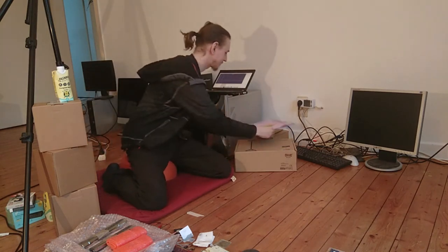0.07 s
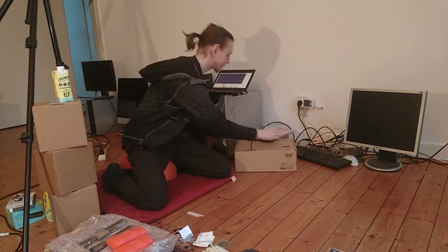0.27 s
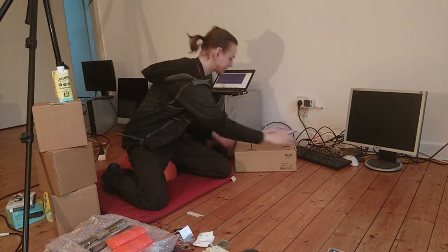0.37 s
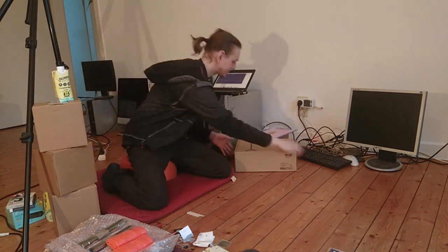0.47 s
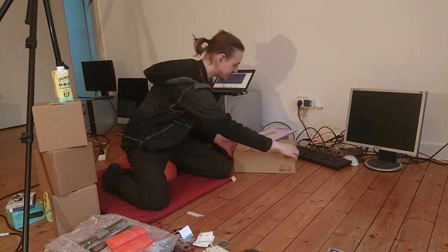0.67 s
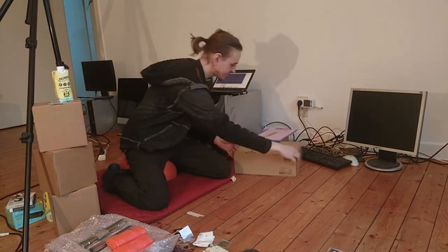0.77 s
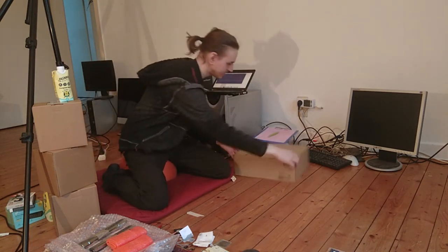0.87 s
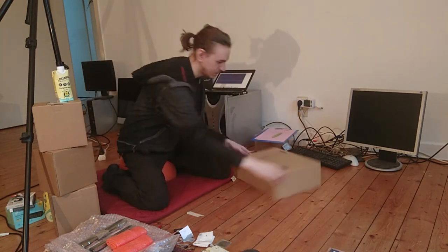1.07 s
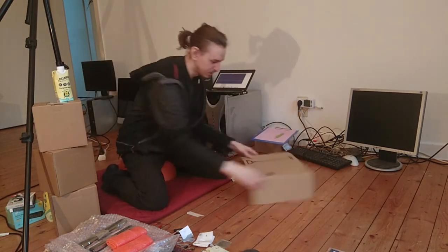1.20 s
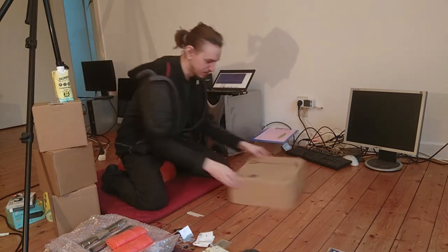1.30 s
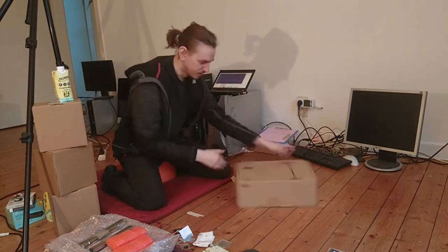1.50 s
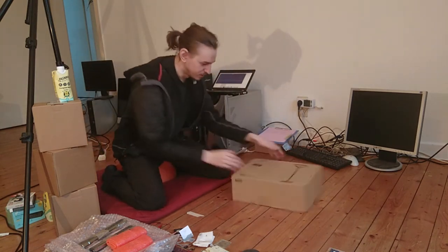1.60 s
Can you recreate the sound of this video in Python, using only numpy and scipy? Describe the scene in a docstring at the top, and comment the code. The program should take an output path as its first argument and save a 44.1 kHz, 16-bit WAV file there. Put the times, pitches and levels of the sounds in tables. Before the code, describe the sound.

Cardboard box in a lively bare room: a tight burst of loud thumps with bright metallic rattle, a short lull, then a much quieter gritty drag over wooden boards with soft bumps, mono microphone.

```python
"""A cardboard box in a bare room takes a burst of blows as something is dropped onto it, then is dragged over floorboards.
Each blow is a half-sine push that rings panel and floor modes, with a short noise slap of card.
Small metal parts inside jangle as ringing modes with noise ticks, then settle. The drag is dense random clicks:
slips hiss, catches shake the damped panels, edges scuff, and the box bumps on the joints of the boards.
A noise tail makes the room; behind it lie air noise and a faint appliance hum. One microphone."""
import sys
import numpy as np
from scipy import signal
from scipy.fft import rfft, irfft
from scipy.io import wavfile
from scipy.ndimage import uniform_filter1d

SR = 44100
rng = np.random.default_rng(int(sys.argv[2]) if len(sys.argv) > 2 else 0)


def ratio_of_db(decibels):
    """Turn decibels (scalar or array-like) into linear amplitude factors; 0 dB maps to 1."""
    return 10 ** (np.asarray(decibels, float) / 20)


def to_wav(s):
    """Save 16-bit WAV."""
    ch = np.atleast_2d(s).T  # columns
    pcm = np.round(np.clip(ch, -1, 1) * 32767)  # PCM
    wavfile.write(sys.argv[1], SR, pcm.astype(np.int16))


N = 72765  # length [samples]

# Blows on the box: (time [s], push level [dB], contact length [ms], slap level relative to the push [dB])
BLOWS = [(.2235, -19.5, 0.71, -8), (.229, -8, 1.93, -15), (.2548, -5.5, 1.08, -10.5),
         (.2585, -5.5, 0.63, -19), (.2645, -9.5, 1.33, -13.5), (.2705, -6.5, 1, -16),
         (.291, -8.5, 1.7, -17), (.316, -9, 1.84, -17)]
# Box panels and the air inside, when free to ring:
# (frequency [Hz], level [dB], ring time t60 [s], extra level when bumped from below [dB])
BOX_MODES = [(123, -8.5, 0.047, -9), (181, -11, 0.053, 0.5), (266, -12, 0.038, 2.5),
             (349.5, -8.5, 0.065, -2.5), (424, -0.5, 0.048, -9), (547, -4.5, 0.04, -1),
             (691, -4, 0.044, -9.5), (758, -6.5, 0.045, -9), (854.6, -14.5, 0.072, 8.5),
             (1128, -10.5, 0.018, 1.5), (1444, -9.5, 0.038, 0), (1760, -31, 0.023, 5)]


def table(rows, x, col=1, log=False):
    """Read a column at x along straight lines between the rows, over log x if asked."""
    r = np.array(rows, float)
    if log:
        return np.interp(np.log(x), np.log(r[:, 0]), r[:, col])
    return np.interp(x, r[:, 0], r[:, col])


def unit(x):
    """Scale to rms 1."""
    return x / np.sqrt(np.mean(x ** 2))


def colour(x, rows):
    """Filter x by a gain curve of (frequency [Hz], gain [dB]) points."""
    hz = np.arange(N // 2 + 1) * SR / N + 1  # 1 Hz up, to keep the logarithm finite
    return irfft(rfft(x) * ratio_of_db(table(rows, hz, log=True)), N)


def ring(x, modes):
    """Each mode is a decaying sine started by x (one row of x per mode, or one for all)."""
    out = np.zeros(N)
    for k, (hz, db, t60, *_) in enumerate(modes):
        pole = np.exp(2j * np.pi * hz / SR - np.log(1000) / (t60 * SR))
        drive = x[k] if x.ndim > 1 else x
        out += ratio_of_db(db) * signal.lfilter([1], [1, -pole], drive).imag
    return out


def grains(per_s, scatter_db):
    """Random clicks of both signs, a few much larger than the rest."""
    chance, sign, size = rng.random((3, N))
    return (chance < per_s / SR) * np.sign(sign - .5) * ratio_of_db(-scatter_db * np.log(size + 0.006))


def walk(rate):
    """Slow smoothed chance, rate new values per second, with a spread of about one half."""
    k = int(SR / rate)
    held = np.repeat(rng.standard_normal(N // k + 1), k)
    return 0.62 * uniform_filter1d(uniform_filter1d(held, k), k)[:N]


def add(x, s, piece):
    """Mix a piece into x at time s [s]."""
    i = int(s * SR)
    x[..., i:i + piece.shape[-1]] += piece[..., :N - i]


def knocks():
    """A half-sine push of contact length rings panels and floor; a short noise slap of card comes with it."""
    # Bumps of the box on the boards: (time [s], push level [dB], contact length [ms])
    bumps = [(.688, -39, 1.2), (0.7002, -30, 1.07), (.716, -42, 1.13), (1.049, -28, 1.57),
             (1.143, -26, 1.34), (1.2624, -24.5, 0.55), (1.271, -25, 0.99), (1.281, -25.5, 1.5),
             (1.294, -24.5, 1.4), (1.362, -26, 0.99)]
    # Deep modes of floor and room: (frequency [Hz], level [dB], ring time t60 [s])
    deep = [(62, -33, 1.17), (64.9, -35.5, 0.3), (94.8, -27, 0.91), (95.6, -25, 0.35)]
    spot_scatter_db = 1.5  # each knock lands elsewhere

    rows = BLOWS + [bump + (-26,) for bump in bumps]  # bumps hardly slap
    count = len(BOX_MODES) + len(deep)
    push, slap = np.zeros((count, N)), np.zeros(N)
    u = np.arange(1500) / SR
    where = ratio_of_db(spot_scatter_db * rng.standard_normal((len(rows), count)))
    where *= (-1) ** np.arange(count)  # neighbouring modes start in opposite directions
    where[len(BLOWS):, :len(BOX_MODES)] *= ratio_of_db(np.array(BOX_MODES)[:, 3])
    noise = rng.standard_normal((len(rows), len(u)))
    for k, (s, db, contact_ms, slap_db) in enumerate(rows):
        shape = np.sin(np.pi * np.clip(u * 1000 / contact_ms, 0, 1))
        add(push, s, ratio_of_db(db) * where[k][:, None] * shape / shape.sum())
        burst = noise[k] * np.exp(-u / 0.0062) * np.clip(u / 0.0005, 0, 1)
        add(slap, s, ratio_of_db(db + slap_db) * burst)
    card = colour(slap, [(300, -21), (1300, 13), (4000, 0), (16000, -5)])
    return ring(push, BOX_MODES) + card, ring(push[len(BOX_MODES):], deep)


def jangle():
    """Clinks start the metal modes with a noise burst plus a tick; random chatter dies away after a main blow."""
    # Clinks of the metal parts: (time [s], level [dB], tick level relative to the clink [dB])
    clinks = [(.1035, -50, 13), (.1415, -51.5, 13.5), (.164, -50, 4), (.183, -56, 7), (.2235, -33, -1),
              (.230, -32.5, 7), (.241, -28, 12), (.2515, -11.5, -10), (.258, -34, -18), (.263, -18, 10),
              (.267, -10, -37), (.277, -23, 7), (.288, -31, -5), (.297, -19, 7), (.306, -18.5, 8),
              (.318, -29.5, -4), (.340, -27.5, 0.5), (.365, -27, 4), (.381, -36, -6), (.391, -28, 0),
              (.411, -22.5, 8), (.439, -41, -5), (.461, -38, 2), (.477, -41, 11), (.512, -55, -3),
              (.626, -40.5, -5), (.749, -42, 3), (.840, -60, -9), (.861, -31.5, -3), (.874, -37, -2)]
    # Modes of the metal parts: (frequency [Hz], level [dB], ring time t60 [s])
    metal = [(2643, -11, 0.055), (2880, -4, 0.023), (3870, -14.5, 0.072), (4850, -4.5, 0.032),
             (5580, -4, 0.011), (5850, -17, 0.088), (6260, -31, 0.033), (7450, -25, 0.074),
             (8900, -4, 0.042), (9860, -2, 0.031), (11620, -5.5, 0.041), (12960, -2, 0.01),
             (14400, -11, .015), (14700, -20, .012)]
    clink_s, tick_s = .002, .0025  # decay of the contact noise and of the tick noise [s]
    metal_scatter_db = 4.5
    chatter_per_s, chatter_db, chatter_t60_s = 490, -26.5, 0.64
    settled_s = .485  # chatter has stopped by this time [s]

    t, u = np.arange(N) / SR, np.arange(900) / SR
    hits, ticks = np.zeros((len(metal), N)), np.zeros(N)
    scatter = np.clip(rng.standard_normal((len(clinks), len(metal), 1)), -2, 1)
    mix = ratio_of_db(-9 + metal_scatter_db * scatter)
    noise = rng.standard_normal((len(clinks), len(metal) + 1, len(u)))
    for k, (s, db, tick_db) in enumerate(clinks):
        contacts = noise[k, 1:] * np.exp(-u / clink_s)
        contacts /= np.sqrt((contacts ** 2).sum(axis=1, keepdims=True))  # equal energy for each mode
        add(hits, s, ratio_of_db(db) * mix[k] * contacts)
        tick = noise[k, 0] * np.exp(-u / tick_s) * np.clip(u / 0.0013, 0, 1)
        add(ticks, s, ratio_of_db(db + tick_db) * tick)

    since = t - BLOWS[3][0]
    fade = (since > 0) * ratio_of_db(chatter_db - 60 * since / chatter_t60_s)
    fade *= np.clip((settled_s - t) / 0.011, 0, 1)
    chatter = fade * grains(chatter_per_s, 3.67)
    hits += chatter * ratio_of_db(-8.5) * rng.standard_normal(hits.shape)
    short_tick = noise[0, 0] * np.exp(-u / 0.00083)
    ticks += ratio_of_db(1.0) * signal.fftconvolve(chatter, short_tick)[:N]
    ticks += fade * ratio_of_db(8) * grains(4200, 2.0)  # finer, denser clicks
    tick_tone = [(1500, -5.5), (3000, 3.5), (5000, 2.5), (9000, 0), (16000, -12.5)]
    return ring(hits, metal) + colour(ticks, tick_tone)


def drag():
    """Dense slips of card on wood hiss; coarser catches shake the panels; edges scuff now and then."""
    # Drag: (time [s], hiss level [dB], panel rumble level [dB])
    levels = [(.6, -56, -48), (.68, -53.5, -55), (.77, -45.5, -50), (.86, -44.5, -41.5), (.94, -43, -50.5),
              (1.01, -41.5, -45.5), (1.07, -41, -41), (1.13, -42, -46), (1.19, -43.5, -42),
              (1.25, -42.5, -53.5), (1.35, -40.5, -41.5), (1.42, -41.5, -43.5), (1.5, -43, -45),
              (1.57, -44.5, -49), (1.65, -46, -48)]
    # Spectrum of the hiss: (frequency [Hz], relative level [dB])
    scrape = [(410, -4), (700, -11.5), (747, -10.5), (862, -15.5), (1080, -6.5), (1510, -5), (2890, -7),
              (5390, -5.5), (9560, -12.5), (15700, -26.5)]
    # Scuffs, where an edge rubs harder for a moment:
    # (time [s], level before its envelope [dB], centre [Hz], half-width [octaves], decay [s])
    scuffs = [(0.858, -44.5, 1430, .12, 0.023), (1.009, -35.5, 3500, 0.76, 0.015),
              (1.028, -39, 2400, 0.21, 0.0072), (1.079, -38.5, 1180, .4, 0.0092),
              (1.142, -37, 1790, 0.44, 0.0037), (1.338, -35, 1390, 0.37, 0.012),
              (1.485, -45, 13500, 0.44, 0.012)]
    slips_per_s, slip_scatter_db = 9000, 2.5
    catches_per_s, catch_scatter_db = 3400, 4
    uneven_db, uneven_per_s = .8, 30  # depth per unit of walk, new values per second

    t = np.arange(N) / SR
    on = np.clip((t - levels[0][0] + .1) / .1, 0, 1)  # fades in over 0.1 s up to the first row
    hiss = unit(colour(grains(slips_per_s, slip_scatter_db), [(200, -46)] + scrape))
    damped = [(hz, db, t60 * 0.093) for hz, db, t60, _ in BOX_MODES]  # panels ring far shorter
    catch_tone = [(50, 3.5), (300, 9.5), (700, 5.5), (2500, -10), (9000, -53)]
    catches = colour(grains(catches_per_s, catch_scatter_db), catch_tone)
    rumble = unit(ring(catches, damped))
    rubbing = hiss * ratio_of_db(table(levels, t)) + rumble * ratio_of_db(table(levels, t, col=2))
    out = on * ratio_of_db(uneven_db * walk(uneven_per_s)) * rubbing
    for s, db, hz, octaves, decay_s in scuffs:
        near, far = 2 ** octaves, 16 ** octaves  # frequency ratios at -5 dB and -32 dB
        band = [(hz / far, -32), (hz / near, -5), (hz, 0), (hz * near, -5), (hz * far, -32)]
        grit = unit(colour(grains(5000, 0.86), band))
        envelope = np.clip((t - s) / 0.003, 0, 1) * np.exp(-np.abs(t - s) / decay_s)
        out += ratio_of_db(db) * grit * envelope
    return out


def room(x):
    """Direct sound plus a noise tail that fades band by band."""
    # Tail: (frequency [Hz], decay time t60 [s], level [dB])
    tail_bands = [(87, 0.88, -9), (270, 0.8, -4.5), (650, 0.64, -0.5), (1390, 0.77, -2.5),
                  (3500, 0.73, -6.5), (6950, 0.42, -7), (13000, 0.13, -8.5)]
    gap_s = .008  # the tail swells in over this time [s]

    t = np.arange(N) / SR
    hz = np.arange(N // 2 + 1) * SR / N + 1
    tail, noise = np.zeros(N), rfft(rng.standard_normal(N))
    for f in 45 * 2 ** np.arange(0, 9, .5):  # overlapping half-octave steps
        t60 = table(tail_bands, f, log=True)
        band = irfft(noise * np.clip(1 - 2 * np.abs(np.log2(hz / f)), 0, 1), N)
        fade = ratio_of_db(table(tail_bands, f, col=2, log=True) - 60 * t / t60)
        tail += band * fade * np.sqrt(2 * np.log(1000) / t60 / SR)  # energy independent of t60
    tail *= np.clip(t / gap_s, 0, 1) ** 2
    return x + signal.fftconvolve(x, tail)[:N]


def quiet():
    """Room air is steady coloured noise; the appliance hum is a set of sines wavering in level."""
    # Spectrum of the air: (frequency [Hz], relative level [dB])
    air_tone = [(15, -36), (25, -25), (58, -10), (261, -5), (554, -7), (1030, -20), (1540, -13),
                (1920, -18), (2650, -13), (5050, -20), (15700, -35)]
    # Hum partials: (frequency [Hz], rms level about which it wavers [dB])
    partials = [(60, -93), (119.5, -64), (198, -67.5), (254, -63.5), (312, -71), (438, -75)]
    air_db = -58.5  # rms

    t = np.arange(N) / SR
    hum = np.zeros(N)
    for hz, db in partials:
        waver = ratio_of_db(db + 1.2 * walk(14))
        hum += waver * np.sqrt(2) * np.sin(2 * np.pi * (hz * t + rng.random()))
    return unit(colour(rng.standard_normal(N), air_tone)) * ratio_of_db(air_db) + hum


def scene():
    """One microphone position feeds both channels; the deep modes and the background get no added tail."""
    panels, deep = knocks()
    heard = room(panels + jangle() + drag()) + deep + quiet()
    return np.tile(heard, (2, 1))


def top_cut(x):
    """Nothing passes above the cut-off."""
    return signal.sosfilt(signal.butter(12, 15820, fs=SR, output="sos"), x)


def record(dry):
    """The microphone drops the deepest bass, below about 56 Hz."""
    low_cut = signal.butter(6, 56, "high", fs=SR, output="sos")
    mix = signal.sosfilt(low_cut, dry)
    return top_cut(mix)


dry = scene()
out = record(dry)
to_wav(out)
```